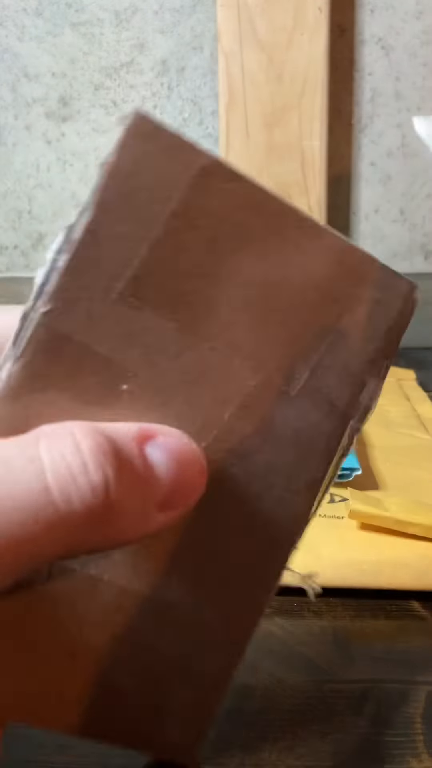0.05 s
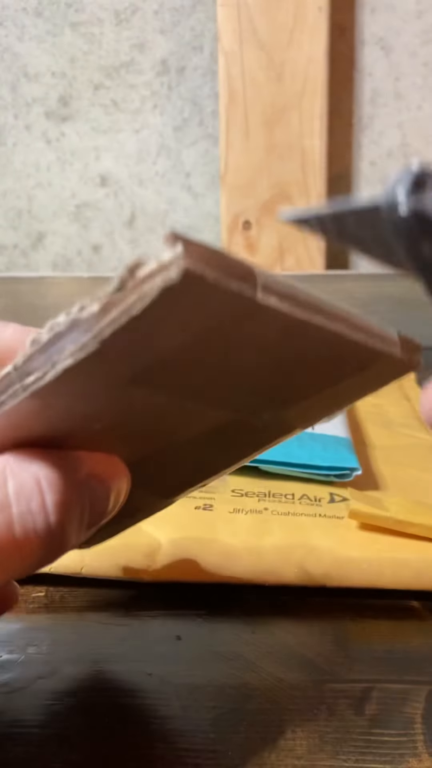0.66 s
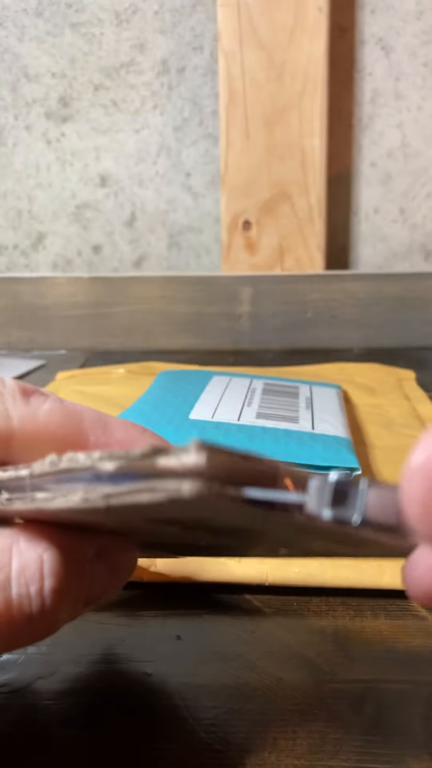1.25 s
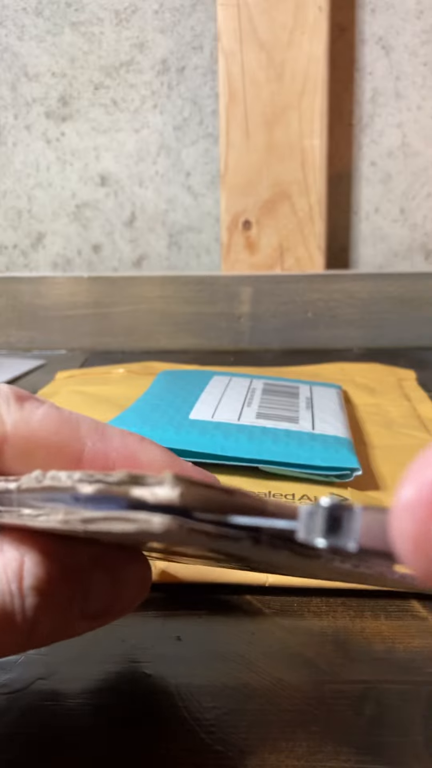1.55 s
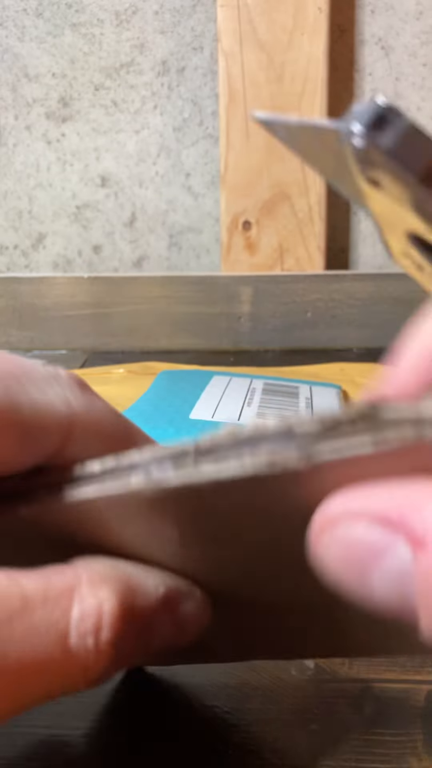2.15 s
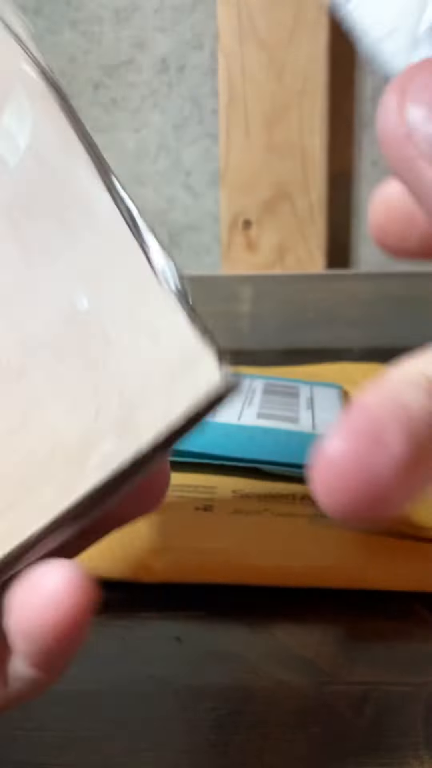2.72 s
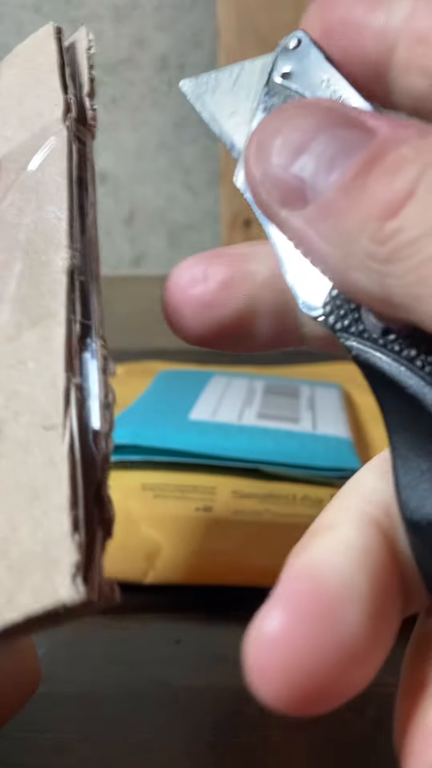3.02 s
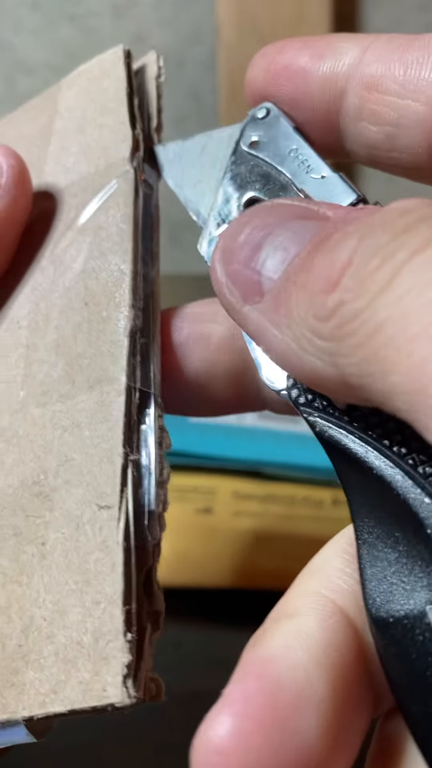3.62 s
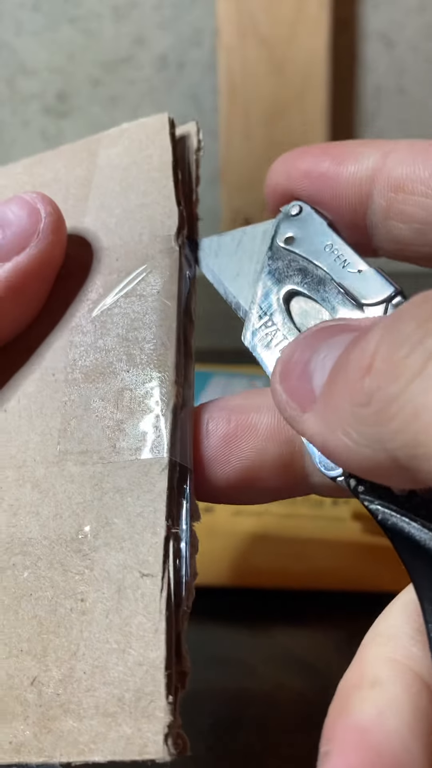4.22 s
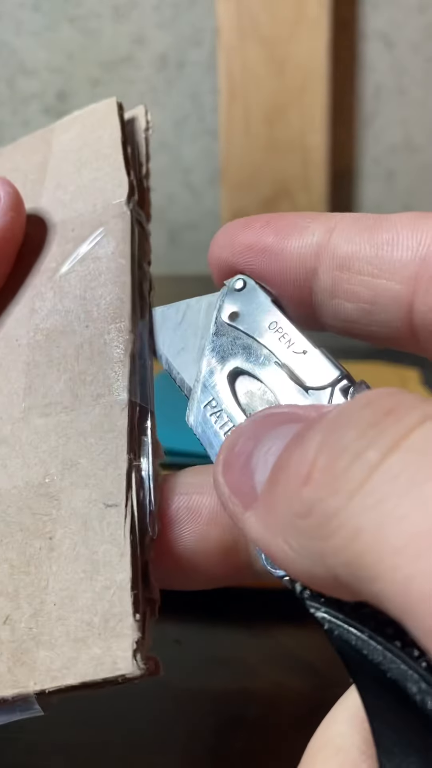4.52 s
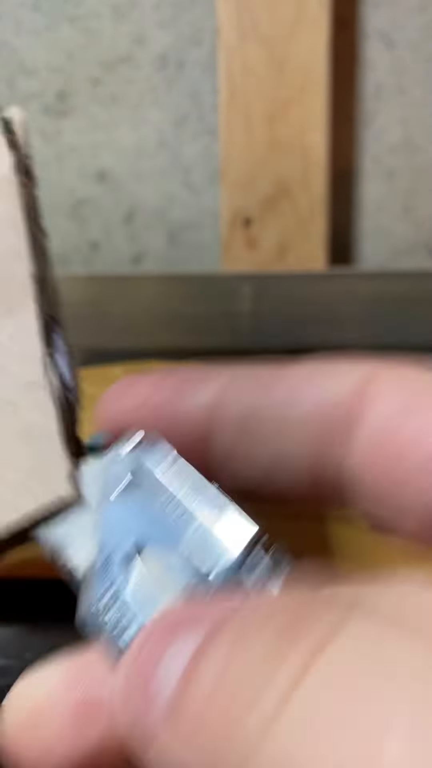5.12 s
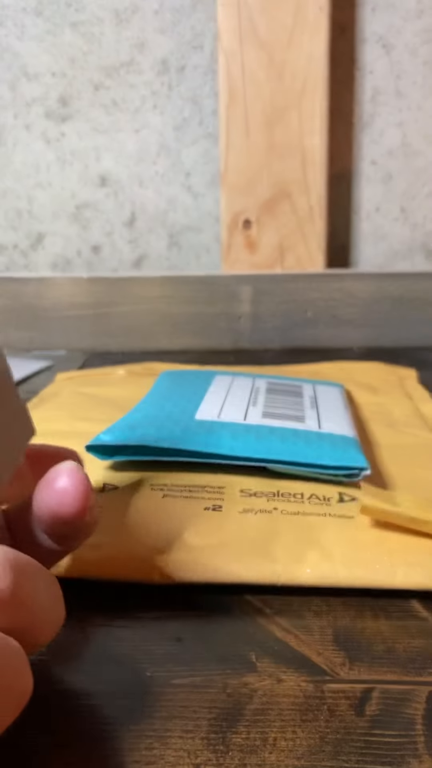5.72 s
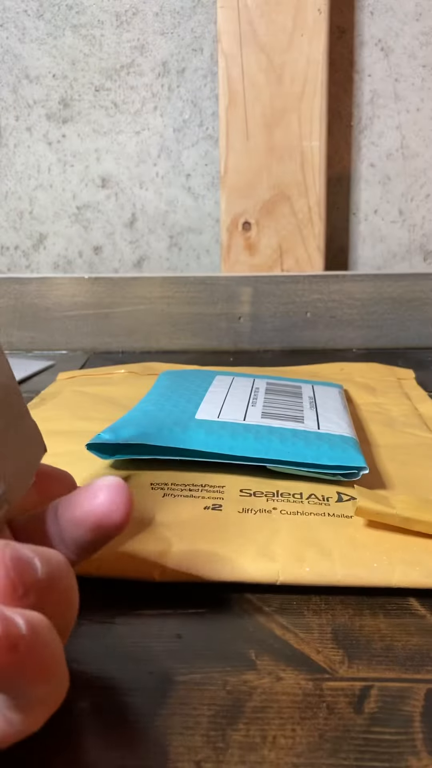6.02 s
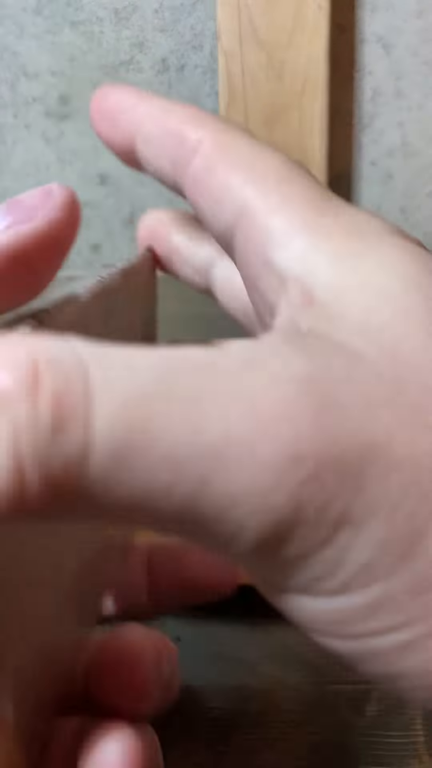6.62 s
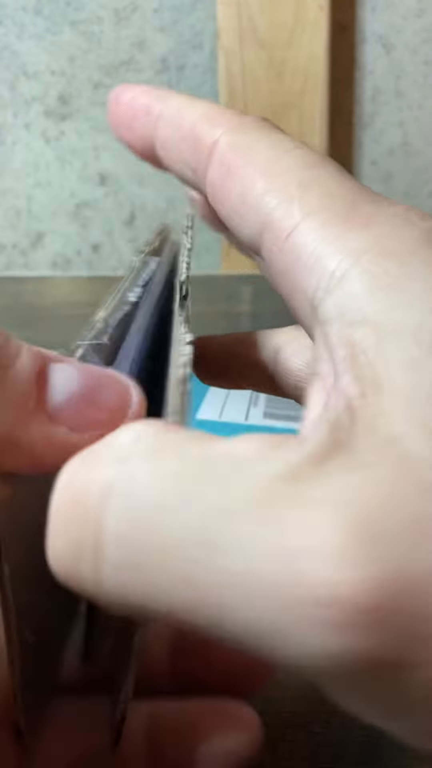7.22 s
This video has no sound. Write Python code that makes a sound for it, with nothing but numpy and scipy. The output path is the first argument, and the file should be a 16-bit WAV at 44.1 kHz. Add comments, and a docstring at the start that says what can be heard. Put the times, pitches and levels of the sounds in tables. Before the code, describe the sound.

A blade ticks and snaps through tape on a handled cardboard mailer, knocks down onto a wooden table, and the cardboard pops open.

```python
"""A taped cardboard mailer is slit with a utility knife, close to a pair of microphone ports.
First it is turned in the hands: skin slides with friction, the walls flex, a stretch of tape rips.
From 3 s the blade creeps, catches and zips through the tape, which fractures in tiny impulses.
Near 6 s the knife is put down, and its impacts excite the modes of a wooden table. Last, the mailer
is squeezed until, near 7.2 s, its mouth pops open. A small room hums quietly throughout."""
import sys
import numpy as np
from scipy import signal
from scipy.fft import rfft, irfft, next_fast_len
from scipy.io import wavfile
from scipy.ndimage import uniform_filter1d, map_coordinates

SR = 44100
rng = np.random.default_rng(int(sys.argv[2]) if len(sys.argv) > 2 else 0)


def transcribe(signal):
    """Save signal, clipped to [-1, 1], as a 16-bit WAV file at the path in sys.argv[1]."""
    frames = np.atleast_2d(signal).T
    limited = np.clip(frames, -1, 1)
    pcm = np.round(limited * 32767).astype(np.int16)
    wavfile.write(sys.argv[1], SR, pcm)


N = 324794
TIME = np.arange(N) / SR  # through the scene [s]
AGE = np.arange(SR // 2) / SR  # within one event [s]


# tape giving way: (time [s], strain length [s], run length [s], level [dB], board share [dB])
TAPE_RIPS = [(1.64, .068, .092, -26.5, -1.5), (4.331, .075, 0.039, -26, -20.5),
             (4.941, 0.095, 0.0086, -30.5, -28), (5.067, 0.069, 0.046, -27, -11),
             (6.597, 0.016, 0.024, -27.5, -30.5), (7.038, .01, 0.063, -38.5, -7),
             (7.175, 0.00503, 0.058, -27, -10.5)]
# spectrum of running tape: (frequency [Hz], level [dB])
TAPE_SPECTRUM = [(500, -27.5), (2000, -17.5), (3400, -18), (4300, -3), (5200, -7.5), (6800, 0), (7800, 1),
                 (10000, 0), (13000, -11), (15500, -9.5)]
# spectrum of the board bending under its pull: (frequency [Hz], level [dB])
BENDING_SPECTRUM = [(100, -5.5), (300, -7.5), (580, 5), (900, 2.5), (1300, -8), (2000, -14), (3200, -9.5),
                    (4350, -1), (6500, -18), (12000, -31)]
def rips():
    """Stick-slip fracture: tape rasps under strain, then runs in dense slips that shake the board."""
    sag_db_per_s, release_db_per_s = -80.5, -1100
    tape, board = np.zeros(N), np.zeros(N)
    for s, strain_s, run_s, db, board_db in TAPE_RIPS:
        t = TIME - s
        strain = amp(np.interp(t, [-strain_s, 0], [-19.5, -6.5])) * (t > -strain_s) * (t < 0)
        run_db = sag_db_per_s * np.maximum(t, 0) + release_db_per_s * np.maximum(t - run_s, 0)
        run = amp(run_db) * (t >= 0)
        tape += amp(db) * (strain + run)
        board += amp(db + board_db) * (amp(-9.5) * strain + run)
    slips = unit(grains(per_s=4200, spread_db=4.5) * amp(2.4 * wobble(380)))
    rasp = amp(-.5) * coloured(tape * slips, TAPE_SPECTRUM)
    return rasp + amp(-1.5) * coloured(board * slips, BENDING_SPECTRUM)


# tape strands and fibres breaking: (time [s], level [dB], board share [dB])
STRAND_SNAPS = [(0.31, -42, -8), (.489, -38.5, -31), (1.153, -42, -13), (1.191, -44.5, -25),
                (1.329, -30.5, -21), (1.560, -27, -5.5), (1.640, -11, -2), (1.645, -13, -2.5),
                (1.655, -14, -9.5), (1.678, -11, -8.5), (1.6861, -21, -12), (1.6935, -15.5, -19.5),
                (1.712, -16.5, -18), (1.7345, -27, 1), (2.152, -34, -8), (2.161, -35, -5),
                (2.170, -29.5, -7.5), (2.307, -33.5, -14.5), (2.358, -22, -11), (2.375, -32.5, -10),
                (2.394, -29.5, -14), (2.424, -26, -15), (2.527, -11.5, -4), (2.551, -18, -4),
                (2.560, -29.5, -6), (2.742, -34, -7), (2.776, -32.5, -8.5), (2.8439, -32.5, -7),
                (4.267, -31.5, -11), (4.2804, -17, -21), (4.2874, -26.5, -14), (4.303, -24.5, -11.5),
                (4.317, -23.5, -13), (4.321, -26, -14.5), (4.3258, -20.5, -20.5), (4.331, -9, -23.5),
                (4.345, -17, -15), (4.357, -21.5, -18.5), (4.369, -24.5, -16), (4.918, -28.5, -13),
                (4.943, -22.5, -31), (4.949, -22, -25), (5.061, -11.5, -14.5), (5.112, -24, -2),
                (5.198, -35, -4), (5.298, -31, -12.5), (5.938, -31, -19), (5.944, -29, -22),
                (6.494, -40, -18), (6.538, -38.5, -8), (6.598, -15.5, -30), (6.615, -22.5, -35),
                (6.62, -21, -30), (6.705, -35.5, -24), (6.876, -33.5, -24), (6.926, -32.5, -18),
                (7.044, -19, -27.5), (7.0502, -23.5, -15.5), (7.070, -22.5, -19), (7.082, -23, -13),
                (7.124, -24.5, -16), (7.157, -27, -8.5), (7.171, -16, -15), (7.1779, -13, -12),
                (7.181, -12, -4), (7.193, -14, -5), (7.213, -9.5, -8), (7.222, -14.5, -0.5)]
# spectra of a breaking strand and of the cardboard: (frequency [Hz], level [dB])
CRACK_SPECTRUM = [(500, -31), (2000, -20.5), (3400, -17.5), (5000, -3.5), (6500, 1.5), (10000, 2.5),
                  (13000, -2), (15500, -4.5)]
BOARD_SPECTRUM = [(100, -2), (300, -6), (600, 3.5), (1000, -3.5), (1500, -2), (2000, -5), (2650, -0.5),
                  (3300, -2), (4250, 3), (6500, -14.5), (12000, -27)]
def snaps():
    """Sudden release of tension: a strand cracks at its own pitch; the board answers for longer."""
    crack_t60, rise_s = .0026, .0002
    tape, board = np.zeros(N), np.zeros(N)
    for s, db, board_db in STRAND_SNAPS + fibre_breaks(grip(), tries_per_s=14, size_db=-42):
        ring_hz = 7570 * np.exp(.1 * rng.standard_normal())
        crack = burst(crack_t60, rise_s) + amp(-23) * burst(t60=.016, rise_s=.001)
        strand = damped_sine(ring_hz, crack_t60) * onset(rise_s)
        add(tape, s, amp(db) * (amp(-.5) * crack + amp(-7.5) * strand))
        add(board, s, amp(db + board_db) * burst(t60=.011, rise_s=.00087))
    return amp(12.5) * coloured(tape, CRACK_SPECTRUM) + amp(6.5) * coloured(board, BOARD_SPECTRUM)


def fibre_breaks(force, tries_per_s, size_db):
    """Breaking threshold: more force snaps fibres more often and more loudly; rows as STRAND_SNAPS."""
    jitter, weakness, looseness, toughness = rng.random((int(tries_per_s * N / SR), 4)).T
    times = (np.arange(len(jitter)) + jitter) / tries_per_s
    pulls = force[(times * SR).astype(int)] / force[force > 0].mean()
    return [(s, size_db + 12 * np.log10(pull) - 12 * weak, -15 - 14 * loose)
            for s, pull, weak, loose, tough in zip(times, pulls, weakness, looseness, toughness)
            if pull > tough]


# the blade creeping along the tape, one list per push: (time [s], level [dB])
BLADE_PUSHES = [
    [(3.1, -80), (3.194, -84), (3.356, -81), (3.622, -79), (3.918, -72), (4.094, -71), (4.19, -69.5),
     (4.255, -56)],
    [(4.41, -68.5), (4.46, -77.5), (4.678, -74), (4.742, -68.5), (4.828, -60), (4.88, -54.5), (4.99, -59.5)],
]
# its tip nicking the taut film: (time [s], level [dB])
BLADE_NICKS = [(3.241, -47), (3.312, -38.5), (3.4645, -50), (3.602, -49.5), (3.758, -43.5), (3.784, -41.5),
               (3.799, -47.5), (3.829, -43.5), (3.835, -42), (3.849, -38.5), (3.853, -41), (3.875, -39.5),
               (3.881, -43.5), (3.916, -47), (3.924, -46), (3.939, -46), (4.009, -31.5), (4.027, -38),
               (4.044, -38), (4.078, -44), (4.0855, -33.5), (4.135, -36.5), (4.139, -42), (4.158, -39),
               (4.170, -44), (4.202, -41.5), (4.2246, -36.5), (4.244, -33.5), (4.2535, -35), (4.662, -39),
               (4.694, -29.5), (4.736, -42.5), (4.761, -40.5), (4.814, -35)]
# spectrum of the film at the tip: (frequency [Hz], level [dB])
FILM_SPECTRUM = [(500, -25), (2000, -19.5), (3400, -17.5), (5000, -9), (6500, -3.5), (8000, -3),
                 (9600, 4.5), (11500, -1), (14000, -7), (15500, -8)]
def blade():
    """Stepwise fracture: the tip parts the film in sharp nicks, with tiny slips and a scrape between."""
    ticks = grains(per_s=220, spread_db=4)
    scrape = amp(-7) * rng.standard_normal(N)
    push = sum(envelope(rows) for rows in BLADE_PUSHES)
    slips = amp(7.5) * (ticks + scrape) * push
    nicks = np.zeros(N)
    for s, db in BLADE_NICKS:
        nick = burst(t60=.0017, rise_s=.00008) + amp(-27) * burst(t60=.014, rise_s=.001)
        add(nicks, s, amp(db) * nick)
    film = coloured(slips + amp(9.5) * nicks, FILM_SPECTRUM)
    return film + amp(-11.5) * coloured(slips, BOARD_SPECTRUM)


# the mailer's walls flexing: (time [s], level [dB], settled pitch [Hz])
WALL_FLEXES = [(.635, -36.5, 129), (.8, -34.5, 108), (.955, -38.5, 76), (1.643, -17, 637),
               (1.645, -32.5, 71.14), (1.68, -19, 800), (2.02, -36, 135), (2.065, -35.5, 149),
               (2.11, -39, 238), (2.17, -26, 432), (2.528, -11, 1750), (2.552, -28, 379),
               (4.34, -27.5, 57.2), (5.092, -20, 584), (5.113, -28, 405), (5.105, -29, 66.6)]
# modes of the freed flap: (frequency [Hz], level [dB], T60 [s])
FLAP_MODES = [(1890, -17, 0.022), (2575, -15.5, 0.044), (2760, -17, 0.05)]
def mailer():
    """Damped free vibration: the walls thump as they flex, the mouth pops open and the flap rings."""
    out = np.zeros(N)
    for s, db, hz in WALL_FLEXES:
        add(out, s, amp(db) * thump(first_hz=1.794 * hz, last_hz=hz, t60=10.9 / hz))
    pop = thump(first_hz=777, last_hz=98.5, t60=.041)  # the pitch drops as the cavity widens
    flap = sum(amp(db) * damped_sine(hz, t60) for hz, db, t60 in FLAP_MODES)
    add(out, 7.1945, amp(-5) * pop)
    add(out, 7.222, flap)
    return out


def thump(first_hz, last_hz, t60):
    """Pitch follows tension: a damped tone settles from first_hz to last_hz, as in a slackening wall."""
    hz = last_hz + (first_hz - last_hz) * np.exp(-AGE / .0034)
    return np.sin(2 * np.pi * np.cumsum(hz) / SR) * fade(t60) * onset(.00062)


# the knife landing: (time [s], level [dB], centre of the blow [Hz], steel share [dB])
KNIFE_KNOCKS = [(5.7227, -9, 1500, -6), (5.727, -6, 302, -31.5), (5.731, -7, 760, -31.5),
                (5.748, -18, 400, -32.5), (5.971, -4.5, 640, -8), (5.974, -9, 460, -28),
                (5.988, -20, 342, -30), (6.002, -14, 600, -33), (6.043, -15, 1430, -20.5),
                (6.051, -13, 260, -37), (6.052, -13, 760, -28), (6.082, -39, 1503, 14),
                (6.092, -12, 600, -20), (6.113, -21, 300, -30.5)]
# modes of the table top: (frequency [Hz], level [dB], T60 [s])
TABLE_MODES = [(124.4, -8, 0.41), (160, -5.5, .07), (197, -5, 0.13), (238, -7, 0.12), (268.7, -13, 0.4),
               (307, -3, .075), (345.6, 0, 0.067), (415, -4.5, 0.09), (500, -3, 0.04), (570, -3, .04),
               (648, 2, 0.06), (789, 3, 0.052), (972, 1.5, 0.064), (1168, -5.5, .06), (1288, 0, 0.07),
               (1403, 1, 0.065), (1558, 0, 0.045), (1680, -1, 0.04), (1950, -2, .04)]
def knife_down():
    """Impact excitation: each blow rings the table's modes near its own pitch, and the steel ticks."""
    lead_in_s, growth_db_per_s = .025, 1699.5  # a brief swell of noise softens the start of each knock
    until_impact = AGE[:int(lead_in_s * SR)][::-1]
    margin = SR // 100  # space for the filters to spread into
    wood, steel = np.zeros(N), np.zeros(N)
    for s, db, centre_hz, steel_db in KNIFE_KNOCKS:
        blow = [(centre_hz / 8, -24), (centre_hz / 2, -5), (centre_hz, 0),
                (centre_hz * 1.25, -4), (centre_hz * 3, -21), (centre_hz * 12, -48)]
        ring = sum(amp(mode_db + rng.normal()) * damped_sine(hz, t60)
                   for hz, mode_db, t60 in TABLE_MODES)
        ring = filtered(np.pad(ring, (margin, 0)), lambda hz: amp(along(blow, hz)))
        thud = thump(centre_hz, centre_hz, t60=10 / centre_hz)  # the top gives for a few cycles
        clatter = burst(t60=.024, rise_s=.0015) + amp(-11.5) * burst(t60=.11, rise_s=.006)
        lead_in = amp(-growth_db_per_s * until_impact) * rng.standard_normal(len(until_impact))
        tick = amp(4) * burst(t60=.0083, rise_s=.0004) + amp(-21.5) * burst(t60=.11)
        add(wood, s - margin / SR, amp(db - 6) * ring)
        add(wood, s, amp(db - 4) * thud)
        add(wood, s, amp(db - 5.5) * coloured(clatter, blow))
        add(wood, s - lead_in_s, amp(db - 12) * coloured(np.pad(lead_in, (0, margin)), blow))
        add(steel, s, amp(db + steel_db) * tick)
    # the stiff top radiates little below its lowest mode
    wood = signal.sosfilt(signal.butter(3, 105, "high", fs=SR, output="sos"), wood)
    return wood + coloured(steel, TAPE_SPECTRUM) + amp(-6.5) * coloured(steel, BOARD_SPECTRUM)


def skid():
    """Intermittent contact: the steel handle rattles over the wood as it slides to rest."""
    contacts = grains(per_s=2200, spread_db=2.5)[:len(AGE)] * fade(t60=.19)
    rattle = resonator(coloured(contacts, BOARD_SPECTRUM), hz=4640, q=4)
    out = np.zeros(N)
    add(out, 5.972, amp(-26) * rattle)
    return out


# short rubs and scrapes of skin, flap and cardboard:
# (middle [s], half-height length [s], level [dB], board share [dB])
SHORT_RUBS = [(.045, 0.053, -50.5, -38), (0.159, 0.051, -50, -27), (0.234, 0.019, -48.5, -10),
              (.322, 0.036, -49, 1.5), (0.449, 0.01, -53.5, -31), (0.531, .04, -60, -25),
              (0.786, 0.064, -62.5, -26), (.913, 0.017, -49, -31), (.978, 0.07, -46, -25),
              (1.271, 0.045, -71, -11), (1.416, .04, -61, -16.5), (1.94, 0.03, -47, -24),
              (1.995, 0.073, -46.5, -17), (2.163, 0.033, -47, -1.5), (2.225, 0.045, -43.5, -18.5),
              (2.31, 0.022, -39.5, -14), (2.34, 0.02, -39, -10), (2.404, 0.047, -42, -22),
              (2.471, 0.043, -49, -7.5), (2.541, .006, -36.5, 1.5), (2.614, 0.022, -43, -19.5),
              (2.682, 0.04, -49, -20), (2.758, 0.014, -46, -6), (2.893, 0.043, -49, -18),
              (2.943, 0.038, -41.5, -14), (3.031, 0.022, -49.5, -8), (3.08, 0.0159, -61.5, -5.5),
              (3.136, .012, -67, 2.5), (3.75, 0.097, -69, -0.5), (4.026, 0.077, -57.5, 1),
              (4.217, 0.0088, -51, 8), (4.834, 0.024, -53, 3), (5.1, .018, -40, 3),
              (5.132, .025, -44, -0.5), (5.174, .014, -40, -11), (5.2, 0.0076, -32.5, -14),
              (5.348, 0.038, -42.5, -35), (5.481, .03, -56, 5.5), (5.588, 0.032, -53, -17),
              (5.912, 0.066, -56, 4), (6.499, 0.0118, -49.5, -21.5), (6.655, 0.024, -45.5, -5),
              (6.773, 0.042, -43, -35), (6.839, 0.04, -39.5, -20), (6.934, 0.02, -54, -20),
              (7.227, 0.011, -34, 5.5), (7.334, 0.051, -48.5, 1)]
# spectrum of sliding skin: (frequency [Hz], level [dB])
SKIN_SPECTRUM = [(200, -36), (600, -22), (1100, -14.5), (2100, -14.5), (3400, -11), (4300, -7),
                 (5700, -2.5), (7500, 1.5), (10000, -1), (13000, -9.5), (15500, -10)]
def rubbing():
    """Sliding friction: skin, flap and cardboard hiss over paper fibres and stir the board beneath."""
    speed = amp(5) * grip()
    drive = amp(-8.5) * speed
    for s, length, db, board_db in SHORT_RUBS:
        add(speed, s - length, amp(db) * swell(length))
        add(drive, s - length, amp(db + board_db) * swell(length))
    fibres = unit(grains(per_s=16000, spread_db=-.5) * amp(2.4 * wobble(160)))
    catches = grains(per_s=200, spread_db=4)
    hiss = amp(-2.5) * coloured(speed * (fibres + amp(-8.5) * catches), SKIN_SPECTRUM)
    board = amp(-3) * coloured(drive * fibres, BOARD_SPECTRUM)
    return shifting(hiss + board + hollow(speed * fibres), depth_db=2.6)


# spells of holding and turning the mailer: (start [s], end [s], level [dB])
GRIP_SPELLS = [(0, 0.24, -58.5), (.36, 1.9, -63), (1.96, 2.69, -56.5), (2.76, 3.076, -60.5),
               (5.13, 5.57, -56), (5.65, 6.55, -61), (6.62, 7.27, -57)]
def grip():
    """Friction noise grows with speed: an uneven gain for how briskly the holding fingers shift."""
    held = sum(amp(db) * gate(start, end, ease_s=.056) for start, end, db in GRIP_SPELLS)
    return held * amp(1.5 * wobble(16))


# resonances of the mailer's air and walls: (frequency [Hz], bandwidth [Hz], level [dB])
MAILER_RESONANCES = [(1480, 250, -29.5), (2310, 1300, -30), (4410, 550, -19.5)]
def hollow(rub):
    """Resonance: the mailer reinforces the rubbing in a few bands."""
    return sum(amp(db) * np.sqrt(SR / (np.pi * width)) * resonator(rub, hz, q=hz / width)
               for hz, width, db in MAILER_RESONANCES)


def shifting(x, depth_db):
    """Spectral modulation: as the contact moves over the sheet, some bands swell and others sink."""
    spectra = signal.stft(x, nperseg=256)[2]
    field = uniform_filter1d(rng.standard_normal(spectra.shape), size=5, axis=0)  # across frequency
    field = uniform_filter1d(field, size=16, axis=1)  # across time
    return signal.istft(spectra * amp(depth_db * unit(field)), nperseg=256)[1][:N]


# squeaks of skin and blade: (middle [s], pitch [Hz], level [dB], half-height length [s])
FRICTION_SQUEAKS = [(0.091, 1275, -54.5, 0.041), (0.956, 2005, -45.5, 0.0075), (4.485, 2094, -65.5, 0.042)]
def squeaks():
    """Stick-slip oscillation: friction settles for a moment on one unsteady pitch."""
    out = np.zeros(N)
    for s, hz, db, length in FRICTION_SQUEAKS:
        shape = swell(length)
        pitch = hz * (1 + .051 * wobble(686)[:len(shape)])
        add(out, s - length, amp(db) * shape * np.sin(2 * np.pi * np.cumsum(pitch) / SR))
    return out


# phase between the two ports: (frequency [Hz], lead of the left port [cycles])
PORT_PHASE = [(0, 0), (120, -.05), (300, -.08), (600, -.15), (1100, -.19), (1330, -.28), (1520, -.8),
              (2100, -.92), (2700, -1.3), (3100, -1.62), (4000, -1.8), (4700, -1.66), (5600, -1.48),
              (6500, -1.36), (7800, -1.06), (9200, -.95), (10500, -.67), (11900, -.5), (13000, -.28),
              (14000, -.02), (16000, 0)]
def direct_sound(x):
    """Phase difference: near sound reaches the two ports at different points of its cycle."""
    lead = lambda hz: np.interp(hz, *np.transpose(PORT_PHASE))
    return filtered(x, lambda hz: np.exp(1j * np.pi * lead(hz) * np.array([[1], [-1]])))


# strength of the early reflections: (frequency [Hz], gain [dB])
REFLECTION_GAIN = [(150, -20), (600, -9), (1000, -3), (2000, -2), (3500, -3), (5000, -7), (7500, -11),
                   (15000, -10)]
def early_reflections(x):
    """Reflection and diffraction: table, hands and wall return copies, while bass bends around them."""
    hop = int(.09 * SR)  # each port gets new paths this often, as the hands move
    padded, copies = np.pad(x, (hop, 2 * hop)), np.zeros((2, N + 3 * hop))
    for start in range(0, N + hop, hop):
        part = padded[start:start + 2 * hop] * signal.windows.cosine(2 * hop)
        for port in copies:
            echoes = np.zeros(SR // 100)
            delay_s = rng.uniform(.0008, .009, 12)
            echoes[(delay_s * SR).astype(int)] = rng.choice([-1, 1], 12) * np.exp(-delay_s / .0033)
            add(port, start / SR, signal.fftconvolve(part, echoes / np.linalg.norm(echoes)))
    return filtered(copies[:, hop:hop + N], lambda hz: amp(along(REFLECTION_GAIN, hz)))


# reverberation time of the room: (frequency [Hz], T60 [s])
ROOM_T60 = [(120, 0.38), (260, 0.34), (500, 0.31), (1400, 0.44), (2800, 0.33), (5000, 0.14), (14000, 0.072)]
def reverberation(x):
    """Absorption: the sound returned by the walls decays at its own rate at each frequency."""
    hz, t, spectra = signal.stft(rng.standard_normal((2, SR // 2)), SR, nperseg=256)
    decay = np.exp(-np.log(1000) * t / along(ROOM_T60, hz)[:, None])
    tail = signal.istft(spectra * decay, SR, nperseg=256)[1]
    tail = diffuse(tail / np.linalg.norm(tail[0]))
    delayed = np.pad(x, (SR // 200, 0))
    return signal.fftconvolve(delayed[None], tail, axes=1)[:, :N]


# spectrum of the room's hum: (frequency [Hz], level [dB])
HUM_SPECTRUM = [(12, -50), (25, -19.5), (40, -8.5), (62, 3), (120, -2.5), (160, -11), (205, -7.5),
                (300, -10.5), (480, -16), (650, -9), (850, -30), (1400, -36.5), (3000, -42), (8000, -54),
                (15000, -53)]
def hum():
    """Stationary noise: the low rush of the room arrives from all around."""
    pair = np.array([coloured(rng.standard_normal(N), HUM_SPECTRUM) for _ in range(2)])
    return amp(-51) * diffuse(pair)


# likeness of the room's sound at the two ports: (frequency [Hz], correlation [0 to 1])
ROOM_COHERENCE = [(100, 0.94), (300, 0.93), (700, 0.26), (1500, 0.36), (5000, 0.026)]
def diffuse(pair):
    """Diffuse-field coherence: two unrelated signals are mixed to be alike mainly in the bass."""
    angle = lambda hz: np.arccos(np.clip(along(ROOM_COHERENCE, hz), -1, 1)) / 2
    mid, side = filtered(pair, lambda hz: np.array([np.cos(angle(hz)), np.sin(angle(hz))]))
    return np.array([mid + side, mid - side])


def amp(db):
    """Decibels to amplitude ratio."""
    return 10 ** (np.asarray(db) / 20)


def unit(x):
    """Normalisation to rms 1."""
    return x / np.sqrt(np.mean(x ** 2) + 1e-20)


def along(points, hz):
    """Interpolation of (frequency [Hz], value) points on a logarithmic axis."""
    knots_hz, values = np.transpose(points)
    return np.interp(np.log(hz + 1), np.log(knots_hz + 1), values)


def gate(start, end, ease_s):
    """Trapezoidal window: 1 from start to end, with a ramp on either side."""
    return np.interp(TIME, [start - ease_s, start, end, end + ease_s], [0, 1, 1, 0])


def envelope(rows):
    """Gain per sample from (time [s], level [dB]) rows, fading out beyond their ends."""
    s, db = np.transpose(rows)
    return amp(np.interp(TIME, s, db)) * gate(s[0], s[-1], ease_s=.02)


def onset(rise_s):
    """Exponential approach to full amplitude."""
    return 1 - np.exp(-AGE / rise_s)


def fade(t60):
    """Exponential decay, by 60 dB in t60 seconds."""
    return np.exp(-np.log(1000) * AGE / t60)


def swell(length):
    """Hann window, above half height for length seconds."""
    return signal.windows.hann(int(2 * length * SR) + 3)


def damped_sine(hz, t60):
    """Free vibration of a single mode."""
    return np.sin(2 * np.pi * hz * AGE) * fade(t60)


def burst(t60, rise_s=.0003):
    """Noise transient: a dying puff whose energy is set by its envelope alone."""
    shape = fade(t60) * onset(rise_s)
    return unit(rng.standard_normal(len(AGE)) * shape) * np.sqrt(np.mean(shape ** 2))


def grains(per_s, spread_db):
    """Shot noise: tiny slips at random moments and of uneven sizes, rms 1."""
    happens = rng.random(N) < per_s / SR
    size = amp(spread_db * np.clip(rng.standard_normal(N), -2, 2))
    return unit(happens * size * rng.choice([-1, 1], N))


def wobble(per_s):
    """Random modulation: a smooth curve through per_s knots a second."""
    knots = rng.standard_normal(int(N * per_s / SR) + 4)
    return map_coordinates(knots, [TIME * per_s])


def add(track, s, x):
    """Superposition: x is mixed into the track from time s."""
    part = track[max(round(s * SR), 0):][:len(x)]
    part += x[:len(part)]


def resonator(x, hz, q):
    """Second-order resonance with quality factor q."""
    return signal.lfilter(*signal.iirpeak(hz, q, fs=SR), x)


def filtered(x, response):
    """Linear filtering: the spectrum of x times a complex response of frequency."""
    n = x.shape[-1]
    size = next_fast_len(n + SR // 4)
    return irfft(rfft(x, size) * response(np.fft.rfftfreq(size, 1 / SR)), size)[..., :n]


def coloured(x, spectrum, size=4096):
    """Minimum-phase filtering at unit energy: the spectrum sets only the shape."""
    cepstrum = irfft(np.log(amp(along(spectrum, np.fft.rfftfreq(size, 1 / SR)))))
    causal_fold = np.r_[1, np.full(size // 2 - 1, 2), np.zeros(size // 2)]
    pulse = irfft(np.exp(rfft(cepstrum * causal_fold)))
    return signal.fftconvolve(x, pulse / np.linalg.norm(pulse))[:len(x)]


def scene():
    """Direct-to-reverberant ratio: the hands are close; the farther table stirs the room more."""
    hands = rubbing() + squeaks() + blade() + shifting(rips(), depth_db=1.5) + snaps() + mailer()
    table = knife_down() + skid()
    direct = direct_sound(hands + table)
    early = early_reflections(hands + amp(-1) * table)
    late = reverberation(amp(-20) * hands + amp(-16) * table)
    return direct + early + late + hum()


def record(dry):
    """Soft saturation and band limiting: peaks are rounded off, and nothing is kept above 16 kHz."""
    rounded = dry / (1 + (dry / .85) ** 4) ** .25
    return filtered(rounded, lambda hz: hz < 16000)


dry = scene()
out = record(dry)
transcribe(out)
```